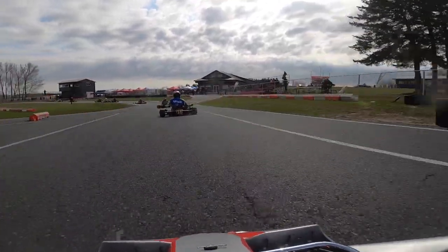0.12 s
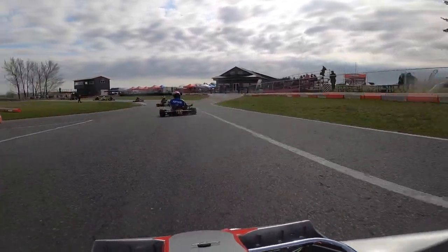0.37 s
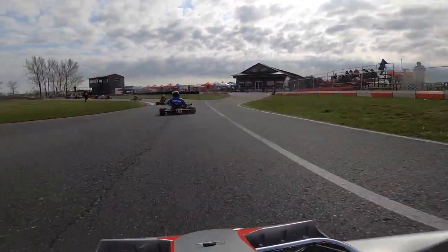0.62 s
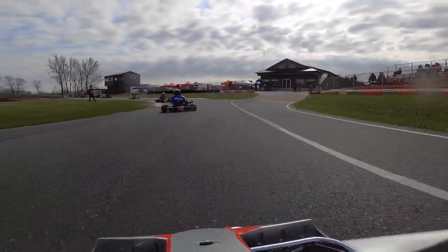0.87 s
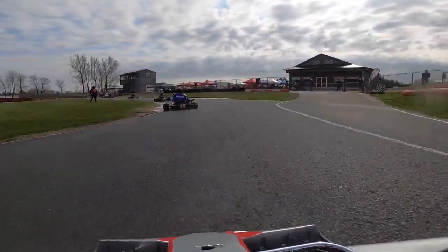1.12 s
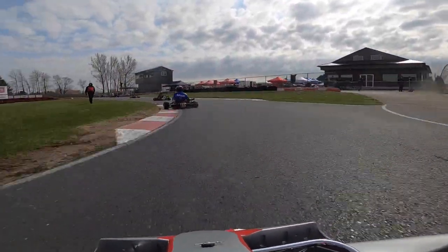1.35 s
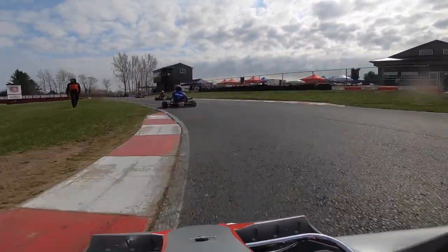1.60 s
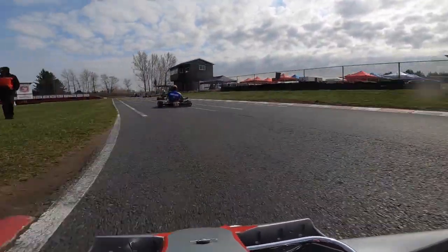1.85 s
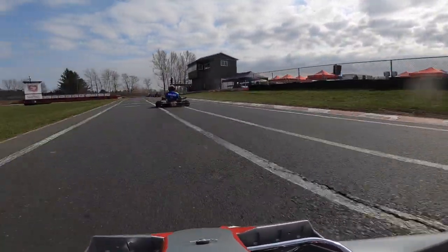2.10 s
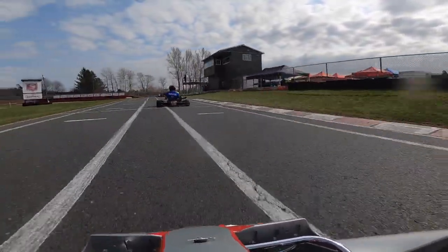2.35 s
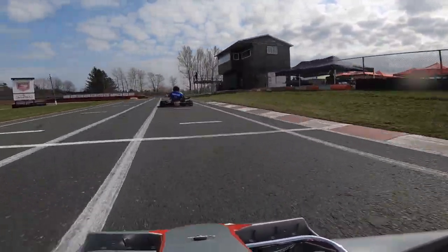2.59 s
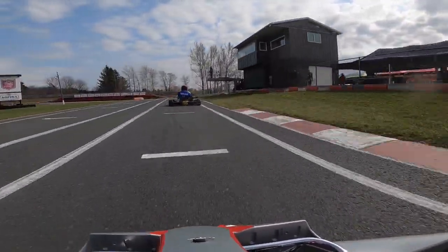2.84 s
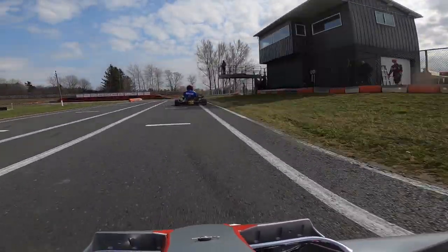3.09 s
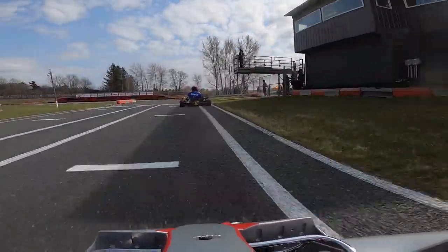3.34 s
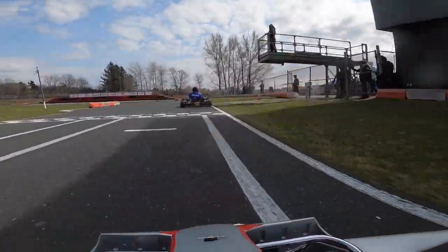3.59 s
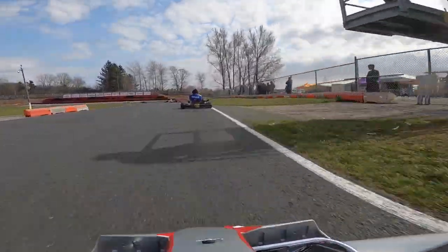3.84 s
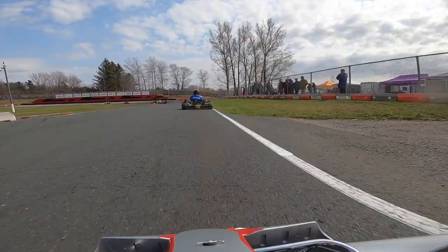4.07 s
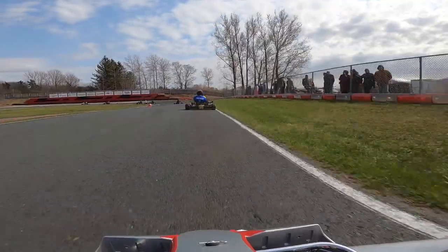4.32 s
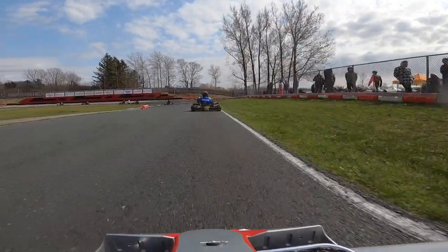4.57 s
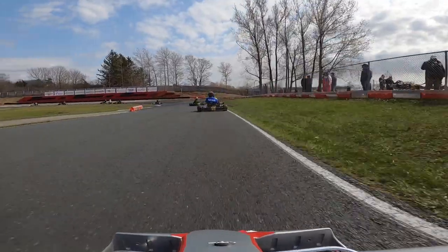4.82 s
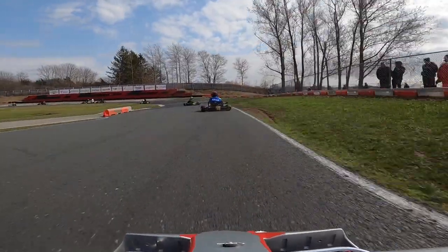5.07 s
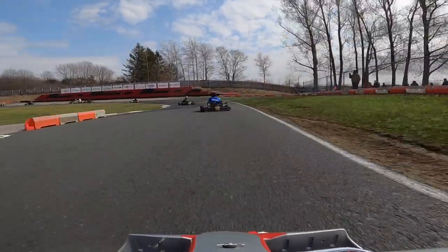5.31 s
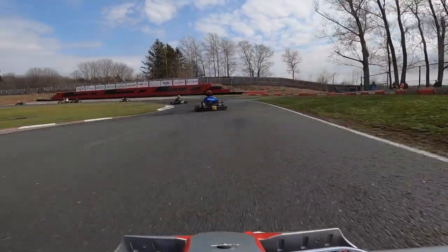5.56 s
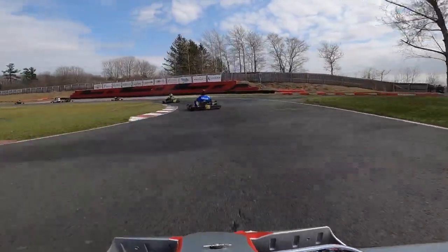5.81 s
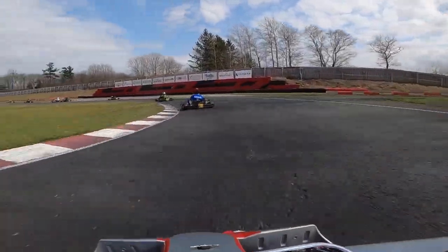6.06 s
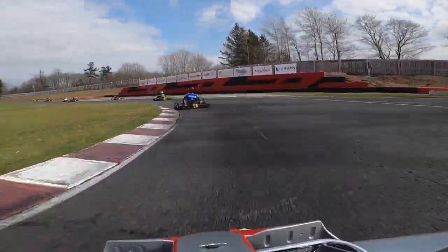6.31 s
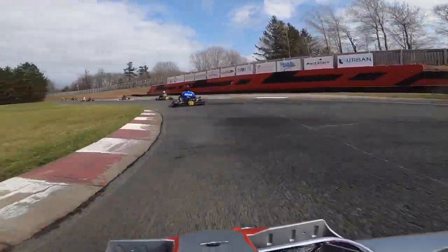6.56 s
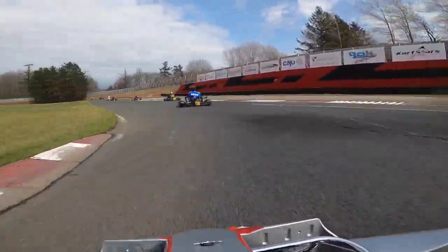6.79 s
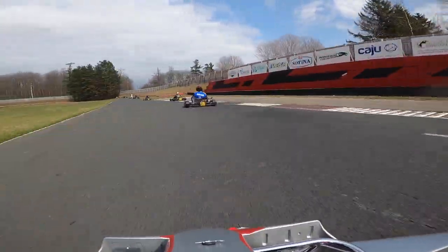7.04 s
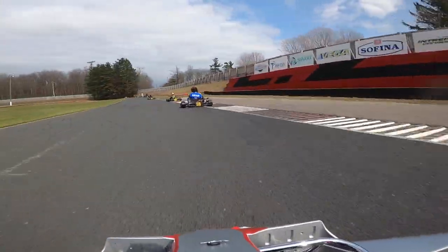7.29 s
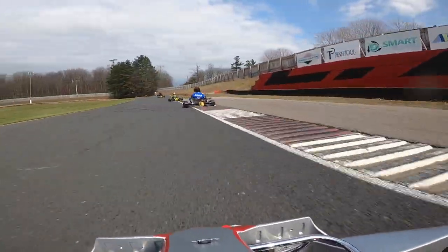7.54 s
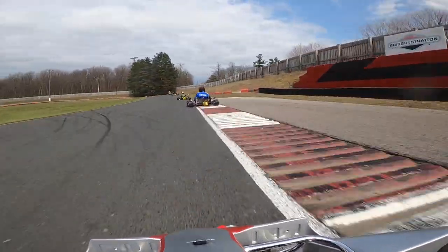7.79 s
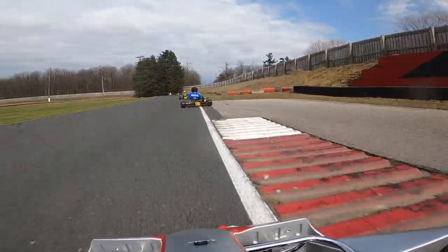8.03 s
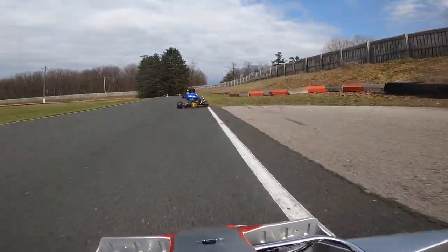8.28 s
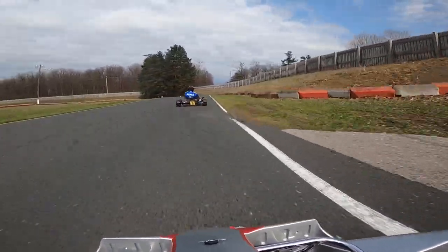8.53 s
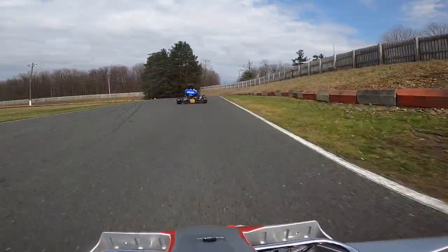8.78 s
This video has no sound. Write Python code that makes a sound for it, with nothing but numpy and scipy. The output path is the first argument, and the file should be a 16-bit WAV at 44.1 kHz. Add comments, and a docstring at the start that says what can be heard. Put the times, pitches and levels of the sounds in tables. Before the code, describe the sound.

A continuous onboard kart ride, recorded close in one channel. The engine's buzzing low hum gradually rises, stutters at top speed just after the middle, dips and hunts in a corner, then starts to climb again. Lumpy wind rumbles over everything. The camera casing shakes on its mount with dense plasticky clatter, hard hollow knocks and crisp ticks that swell over bumps, plus a faint thin buzz.

```python
"""Racing kart ride

Aboard a kart, a four-stroke single drones as multiples of its firing rate, shaped by exhaust and frame.
It touches its rev limiter before a bend and hunts in speed through it. Wind is shaped noise that
buffets the camera. The camera's housing rattles and knocks on its mount, as short ringing modes and
bright ticks, over a thin buzz. The camera's gain control squeezes the peaks."""
import sys
import numpy as np
from scipy import signal
from scipy.fft import rfft, irfft
from scipy.io import wavfile
from scipy.ndimage import uniform_filter1d

SR = 44100
rng = np.random.default_rng(int(sys.argv[2]) if len(sys.argv) > 2 else 0)


def boost(x):
    """Linear amplitude factor 10**(x/20) for a level x in decibels (scalar or array-like)."""
    u = np.asarray(x, float) / 20
    return 10 ** u


def generate_wav(sig):
    """Save sig (samples, or channels by samples) to the path in sys.argv[1] as 16-bit PCM at SR."""
    pcm = np.round(np.clip(np.atleast_2d(sig).T, -1, 1) * 32767).astype(np.int16)
    wavfile.write(sys.argv[1], SR, pcm)


N = 392490  # length in samples

# engine speed before the hops are added: (time [s], firing rate [firings per s])
SPEED = [(0.0, 42.1), (0.9, 43.8), (1.5, 45.15), (1.9, 45.6), (2.4, 45.8), (3.9, 48.2), (4.8, 50.06),
         (5.4, 50.25), (6.15, 49.86), (6.36, 49.0), (6.9, 48.15), (7.38, 47.1), (7.6, 47.42), (8.1, 47.44),
         (8.9, 48.23)]
# the rear wheels hop through the bend and the engine briefly runs free:
# (time [s], added speed [firings per s])
HOPS = [(6.47, .6), (6.66, .7), (6.82, .35), (7.02, 1.45), (7.24, .85), (7.48, .45)]
HOP_S = .05  # from the middle of a hop to where it has sunk to 1/e
# how hard the engine pulls: (time [s], level [dB])
LOAD = [(0.0, -3.5), (1.1, 1), (1.75, -5), (2.4, 0), (3.0, -2.5), (3.9, 0), (4.8, 1.5), (5.5, 0),
        (6.3, -1.5), (7.2, -0.5), (8.0, -1), (8.9, 2)]
# rev limiter: (time [s], depth of the cut [0-1], share of sparks skipped [0-1])
LIMITER = [(4.8, 0, .24), (5.0, .2, .3), (5.25, .26, .38), (5.55, .29, .48), (5.8, .29, .41),
           (6.05, 0, .41)]
SURGE_TURNS = .06  # the crank runs ahead and falls back with the skipped sparks; scaled by cut depth
# exhaust and frame response met by each multiple of the firing rate: (frequency [Hz], base level [dB])
FRAME = [(40, -43), (86, -38.5), (93, -30), (101, -26.5), (135, -31), (172, -24.5), (200, -32.5),
         (218, -21.5), (245, -18.5), (272, -24), (288, -23.5), (305, -26), (335, -31.5), (375, -34.5),
         (420, -34.5), (480, -41.5), (600, -53)]
CRANK_DB = 3  # extra on even multiples: the crank turns twice a firing
# shake of the crank's unbalance, felt less when the wheels are busy in a bend: (time [s], level [dB])
UNBALANCE = [(0.0, -3), (1.2, -6), (1.8, 2.5), (3.7, -2), (4.2, 2.5), (5.2, 3), (5.6, -2.5), (7.0, -4.5),
             (7.7, 0), (8.2, 2), (8.9, -5.5)]
# each firing is one pulse of fixed shape: multiples above the strongest pair lag behind those below
LAG_MULTIPLE, LAG_WIDTH, LAG_TURNS = 5.55, .12, .38  # middle and width in multiples, lag in cycles

# strength of the wind buffeting before gusts: (time [s], level [dB])
WIND = [(0.0, -14.5), (.9, -15.5), (1.5, -15.5), (2.4, -16), (3.2, -14.5), (4.2, -17), (5.2, -15),
        (6.6, -15), (7.5, -15), (8.9, -15.5)]
# colour of the buffeting: (frequency [Hz], relative level [dB])
BUFFET = [(20, -34), (32, -5), (45, 0.5), (65, 1.5), (100, -0.5), (200, -0.5), (270, -2), (350, -6.5),
          (480, -10), (700, -20), (1500, -27), (4000, -83)]
# colour of the slow heave of large eddies: (frequency [Hz], relative level [dB])
HEAVE = [(4, -12), (12, -5), (24, 1.5), (36, 1), (55, -11.5), (120, -40)]
HEAVE_DB = -32  # level before gusts
GUST_DB, GUST_HZ = 0.87, 1.9  # slow unevenness of the wind

# the hardest knocks of the housing:
# (time [s], relative peak [dB], pitch before it is drawn nearer the others [Hz], brightness [dB])
KNOCKS = [(0.086, -14.5, 1340, -28), (0.117, -20, 1220, -15.5), (0.153, -14, 1010, -18),
          (0.281, -11, 1290, -13), (0.332, -14.5, 1570, -25), (0.396, -13, 950, -30),
          (0.448, -11, 850, -22), (0.473, -14, 939, -14), (0.733, -17, 840, -20), (0.763, -16.5, 1400, -21),
          (0.851, -12.5, 840, -24), (0.956, -8.5, 1250, -24), (1.04, -12.5, 1350, -18),
          (1.069, -10, 786, -25), (1.239, -17, 1320, -19), (1.311, -13.5, 1180, -18), (1.4, -15, 762, -15),
          (1.599, -16, 931, -14), (1.667, -17.5, 1390, -18), (1.697, -15.5, 1260, -14),
          (1.727, -12.5, 1130, -16), (1.828, -17.5, 880, -9), (1.87, -14, 1370, -22),
          (1.903, -17.5, 1170, -12), (2.223, -21, 1270, -18), (2.308, -13, 1080, -12),
          (2.363, -16, 1400, -16), (2.392, -16, 1190, -11), (2.42, -14, 1200, -10),
          (2.445, -19.5, 1380, -7), (2.593, -11, 1250, -19), (2.753, -13, 899, -19),
          (2.785, -18, 1440, -15), (2.815, -25, 1240, -14), (2.893, -22, 1370, -20),
          (2.958, -15.5, 1370, -9.5), (2.99, -14, 1340, -25), (3.124, -13.5, 888, -20.5),
          (3.15, -20.5, 999, -11), (3.173, -16, 934, -10), (3.278, -19.5, 896, -21),
          (3.431, -13, 1270, -15), (3.493, -21, 1480, -16), (3.613, -17, 1290, -18),
          (3.635, -19, 1290, -10), (3.732, -16, 794, -13), (3.831, -16, 1340, -18), (3.951, -21, 1070, -21),
          (3.989, -15, 1060, -21), (4.207, -16, 1310, -20), (4.24, -14, 1290, -23),
          (4.27, -17, 1290, -20.5), (4.302, -12.5, 1340, -22), (4.443, -12.5, 1370, -13.5),
          (4.527, -14.5, 1320, -10), (4.553, -14, 1420, -14), (4.752, -13.5, 1190, -13),
          (4.774, -15, 1200, -20), (4.91, -16.5, 1390, -17), (4.949, -15, 1270, -15),
          (5.022, -16, 1370, -15), (5.321, -13.5, 1360, -27), (5.499, -19, 1170, -9),
          (5.56, -24, 1030, -16), (5.887, -12, 1280, -18), (6.347, -20, 1340, -17),
          (6.566, -16.5, 1260, -16), (6.627, -18, 1220, -19), (7.11, -14, 1350, -15.5),
          (7.254, -17.5, 853, -18), (7.38, -17, 1220, -7), (7.52, -16, 1280, -16), (7.844, -12.5, 890, -24),
          (7.962, -17.5, 953, -15), (8.163, -10.5, 1380, -17), (8.288, -19, 1360, -18),
          (8.362, -11, 1300, -11), (8.386, -20, 754, -16), (8.426, -13, 1420, -19), (8.499, -15, 1360, -25),
          (8.565, -14, 1420, -13), (8.62, -16, 993, -15), (8.764, -11, 980, -19), (8.83, -18, 1300, -23)]
KNOCK_TICK_DB = 16  # lift of the bright part of a knock
# ringing modes of the housing:
# (frequency before stretching [Hz], relative level [dB], time to die by 60 dB [s])
HOUSING = [(905, -12, 0.026), (1027, -7.5, 0.019), (1288, 5.5, 0.0094), (1500, -19, 0.013)]
# colour of the bright ticks: (frequency [Hz], relative level [dB])
TICK = [(500, -14), (1500, 7), (2000, -1), (2760, 2.5), (3600, -2), (3870, -5), (4100, -3), (4950, -4),
        (5400, -10.5), (6500, -13.5), (7300, -22.5), (8680, -37), (15000, -39)]
SHAKE_DB, TICKS_DB = -30, -36.5  # rattle on smooth road: ring of the housing, bright ticks
# side load strains the mount, so ticks and buzz grow through the bends: (time [s], level [dB])
STRAIN = [(0.0, -3.5), (1.1, -2), (1.5, 0.5), (1.75, 4.5), (2.05, 2), (2.3, 0.5), (3.4, -1), (4.0, -2),
          (4.3, -0.5), (4.7, 0.5), (5.1, -1.5), (5.7, 0.5), (6.3, 0), (7.0, 1), (7.6, -2), (7.9, 2.5),
          (8.3, 1), (8.9, -2.5)]
# bumps in the road swell the rattle, smooth patches hush it: (time [s], height of the swell [dB])
BUMPS = [(.47, 10.5), (.62, 4.5), (.69, 2), (.78, 4), (1.06, 2.5), (1.64, 2.5), (2.21, -5), (2.43, 0.5),
         (2.99, 6), (3.08, 6), (3.29, 6), (3.5, 8), (3.8, 5), (4.03, -10), (4.14, 3.5), (4.48, 5),
         (4.68, 5), (4.9, -6.5), (4.99, 7), (5.21, 6), (5.6, 8), (5.89, 4), (6.11, -6), (6.46, 3.5),
         (6.6, 6), (6.95, 4.5), (7.12, 4), (7.57, 6.5), (7.78, 7), (7.94, 6.5), (8.17, 0), (8.58, 5)]
BUMP_S = 0.035  # from the middle of a bump to where it has sunk to 1/e
BUMP_IN_RING, BUMP_IN_TICKS = 0.65, .7  # share of the swell that reaches each
# the mount swings on its own spring and throws the housing at each swing:
# (frequency [Hz], relative level [dB])
MOUNT = [(10, -30), (27, -14), (33, 0), (40, -14), (100, -40)]
MOUNT_DB = 1  # rms swing of the tap level

# colour of the thin buzz of the mount: (frequency [Hz], relative level [dB])
BUZZ = [(3000, -28), (5200, -11), (6200, 1), (7500, -5.5), (10000, -7), (15000, -20)]
BUZZ_DB = -61.5  # level before throb and swells

# treble roll-off of the whole sound: (frequency [Hz], gain [dB])
ROLL_OFF = [(7500, -0.5), (8700, -10), (11300, -23), (14000, -36.5), (20000, -59.5)]


def evened(x):
    """Scales to rms 1."""
    return x / np.sqrt(np.mean(x ** 2) + 1e-20)


def read(points, hz):
    """Reads a spectrum at the given frequencies, in between on a log scale."""
    f, value = np.transpose(points)
    return np.interp(np.log(hz + 1), np.log(f + 1), value)


def curves(rows):
    """The columns of a table, sample by sample."""
    s, *columns = np.transpose(rows)
    return [np.interp(np.arange(N) / SR, s, c) for c in columns]


def humps(rows, width_s):
    """A smooth hump of the given height at each time; overlapping humps add."""
    t = np.arange(0, N, 64) / SR  # a coarse time grid is enough
    s, height = np.transpose(rows)
    shapes = np.exp(-((t[:, None] - s) / width_s) ** 2)
    return np.interp(np.arange(N) / SR, t, shapes @ height)


def wander(hz):
    """Slow chance of rms 1, varying up to about hz."""
    count = 4096
    f = np.fft.rfftfreq(count, N / SR / count)
    spectrum = rfft(rng.standard_normal(count)) / (1 + (f / hz) ** 4)
    slow = irfft(spectrum)
    return evened(np.interp(np.arange(N) * count / N, np.arange(count), slow))


def coloured(x, points):
    """Shapes the spectrum of x."""
    gain_db = read(points, np.fft.rfftfreq(len(x), 1 / SR))
    return irfft(rfft(x) * boost(gain_db), len(x))


def firing_rate():
    """Firings per second: the run of the lap plus the hops."""
    return curves(SPEED)[0] + humps(HOPS, HOP_S)


def engine():
    """Multiples of the firing rate through the frame; uneven burns make each waver."""
    rate = firing_rate()
    (load_db,), (unbalance_db,) = curves(LOAD), curves(UNBALANCE)
    depth, skipped = curves(LIMITER)
    cut = 2 * np.pi * np.cumsum(rate * skipped) / SR
    surge = SURGE_TURNS * depth * np.sin(cut)
    turns = np.cumsum(rate + 0.09 * wander(13.3)) / SR + surge  # counts firings
    spark = 1 - depth + 2 * depth * np.cos(cut)  # skipped sparks put lines between the multiples
    drone = np.zeros(N)
    for k in range(1, 13):
        db = read(FRAME, k * rate) + CRANK_DB * (k % 2 == 0) + 0.87 * wander(5)
        lag = LAG_TURNS * np.arctan((k - LAG_MULTIPLE) / LAG_WIDTH) / np.pi
        line = boost(db) * np.sqrt(2) * np.cos(2 * np.pi * (k * turns - lag))
        if k == 2:  # the crank's unbalance ignores spark and load
            drone += line * boost(unbalance_db)
        else:
            drone += line * spark * boost(load_db)
    return drone


def wind():
    """Lumpy low pressure swirls at the microphone port; slower, larger eddies heave beneath."""
    buffet = evened(coloured(rng.standard_normal(N), BUFFET))
    heave = evened(coloured(rng.standard_normal(N), HEAVE))
    gust_db = 2.05 * wander(20.6) + GUST_DB * wander(GUST_HZ)
    return boost(gust_db) * (boost(curves(WIND)[0]) * buffet + boost(HEAVE_DB) * heave)


def ring(modes, stretch=1, contact_s=.0004):
    """A few quickly dying modes struck once by a soft contact."""
    t = np.arange(1500) / SR
    contact = 1 - np.exp(-(t / contact_s) ** 2)
    tones = sum(boost(db - 60 * t / t60) * np.sin(2 * np.pi * hz * stretch * t) for hz, db, t60 in modes)
    return contact * tones


def knocks():
    """Each knock rings the housing near its own pitch and throws a short bright tick."""
    body, sharp = np.zeros(N + 1500), np.zeros(N)
    fade = np.hanning(300) ** 2 * np.exp(-np.arange(300) / 100)
    puffs = rng.standard_normal((len(KNOCKS), 300)) * fade
    for (s, db, hz, bright_db), puff in zip(KNOCKS, puffs):
        at = round(s * SR)
        stretch = (hz / HOUSING[2][0]) ** .6  # relative to the third mode, pitches drawn closer together
        sound = ring(HOUSING, stretch, contact_s=0.00076)
        body[at:at + 1500] += boost(db) * sound / abs(sound).max()
        sharp[at:at + 300] += boost(db + bright_db) * puff
    return boost(2) * body[:N] + boost(KNOCK_TICK_DB) * coloured(sharp, TICK)


def taps(per_s, spread_db, bunch_db):
    """Random taps in bunches, a few much larger."""
    hit = rng.random(N) < per_s / SR
    size_db = spread_db * np.minimum(rng.exponential(1, N), 3.2) + bunch_db
    return hit * boost(size_db) * rng.choice([-1., 1.], N)


def rattle():
    """Dense taps ring the housing at scattered pitches and tick brightly over a steadier rush of air."""
    bump_db, (strain_db,) = humps(BUMPS, BUMP_S), curves(STRAIN)
    swing = evened(coloured(rng.standard_normal(N), MOUNT))
    bunch_db = 1.5 * wander(30) + MOUNT_DB * swing
    stretches = np.geomspace(.78, 1.2, num=5)  # five spots on the housing, each with its own pitch
    blows = [taps(130, spread_db=3.5, bunch_db=bunch_db) for _ in stretches]
    rings = [signal.oaconvolve(b, ring(HOUSING, s))[:N] for b, s in zip(blows, stretches)]
    body = evened(sum(rings))
    fine = taps(2500, spread_db=1.6, bunch_db=1.19 * bunch_db + 1.0 * wander(26))
    rush = 0.27 * rng.standard_normal(N)
    ticks = evened(coloured(0.66 * evened(sum(blows)) + evened(fine) + rush, TICK))
    ring_db = SHAKE_DB + BUMP_IN_RING * bump_db
    tick_db = TICKS_DB + strain_db + BUMP_IN_TICKS * bump_db
    return boost(ring_db) * body + boost(tick_db) * ticks


def lift_off():
    """The housing floats free just before each hard knock, so its rattle hushes."""
    t = np.arange(N) / SR
    times = np.append(np.transpose(KNOCKS)[0], np.inf)
    ahead = times[np.searchsorted(times, t)] - t  # seconds until the next knock
    return 1 - .4 * np.exp(-(ahead / .009) ** 2)


def buzz():
    """High noise of the mount that throbs once a firing and swells with bumps and strain."""
    throb = 1 + np.cos(2 * np.pi * np.cumsum(firing_rate()) / SR)
    swell_db = curves(STRAIN)[0] + humps(BUMPS, BUMP_S) + 3 * wander(12)
    hiss = evened(coloured(rng.standard_normal(N), BUZZ))
    return boost(BUZZ_DB + swell_db) * throb * hiss


def scene():
    """Everything reaches one microphone."""
    mix = engine() + wind() + knocks() + lift_off() * rattle() + buzz()
    return mix[None]  # one channel


def band_limit(x):
    """A steep low-pass at the top of the band."""
    return signal.sosfilt(signal.butter(12, 14880, fs=SR, output="sos"), x)


def record(dry):
    """Fast gain control squeezes the peaks, then come a soft limit and the treble roll-off."""
    power_db = 10 * np.log10(abs(uniform_filter1d(dry ** 2, 600, axis=1)) + 1e-9)
    over_db = np.maximum(power_db + 14.0, 0)  # how far the level exceeds -14 dB
    held = dry * boost(0.5 - 0.34 * uniform_filter1d(over_db, 300, axis=1))
    ceiling = .85
    limited = ceiling * np.tanh(held[0] / ceiling)
    finished = coloured(limited, ROLL_OFF)
    return band_limit(finished[None])


dry = scene()
out = record(dry)
generate_wav(out)
```